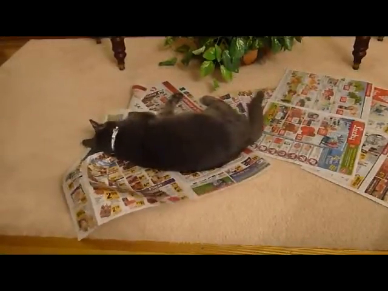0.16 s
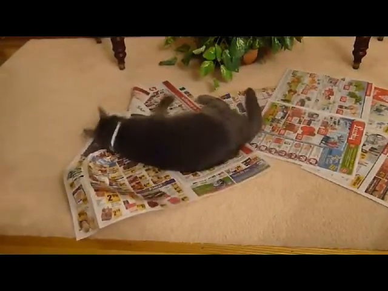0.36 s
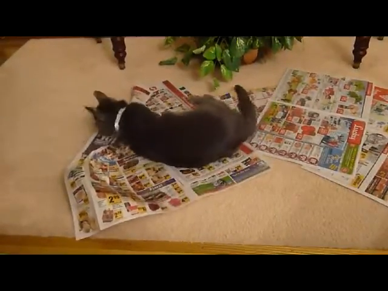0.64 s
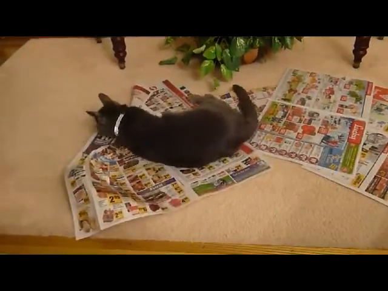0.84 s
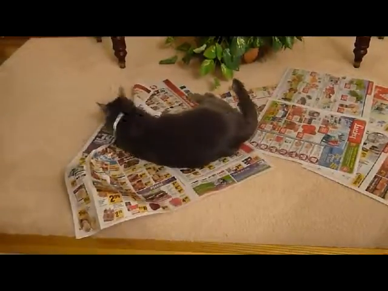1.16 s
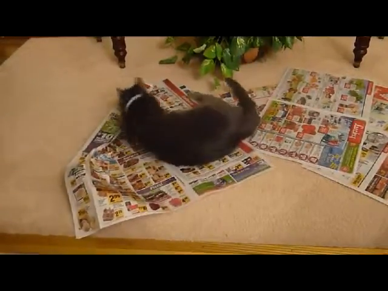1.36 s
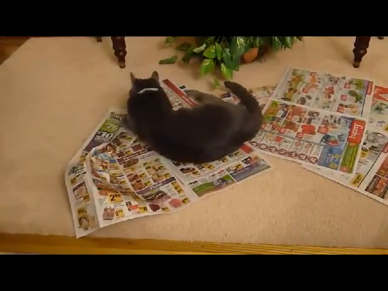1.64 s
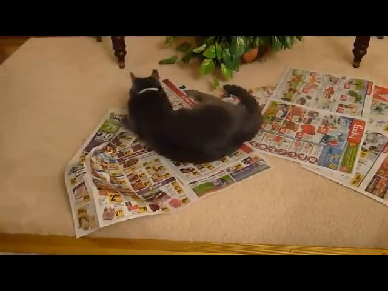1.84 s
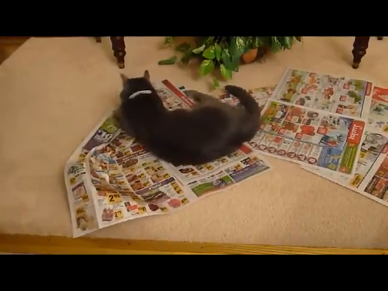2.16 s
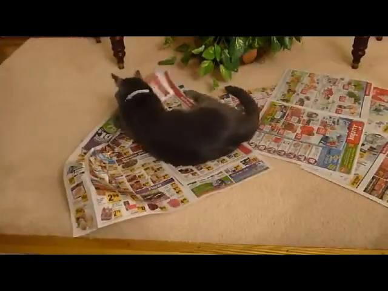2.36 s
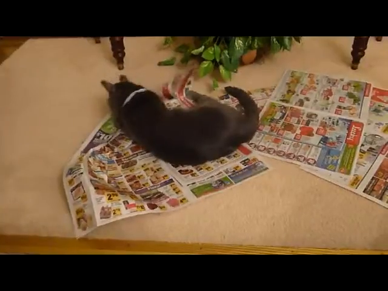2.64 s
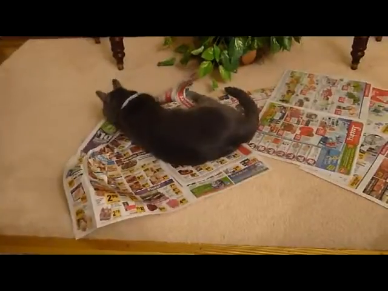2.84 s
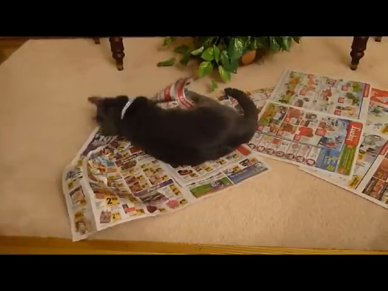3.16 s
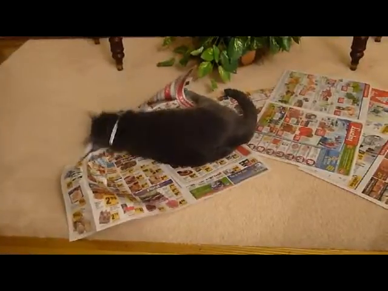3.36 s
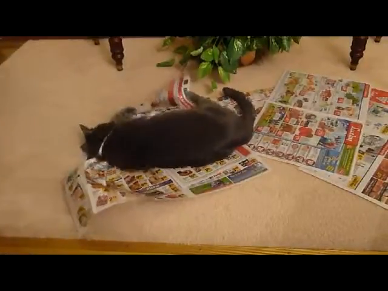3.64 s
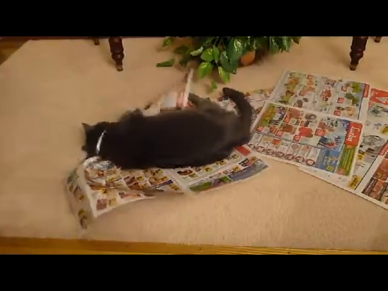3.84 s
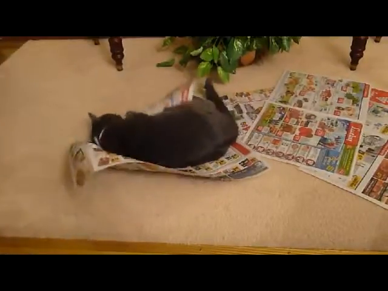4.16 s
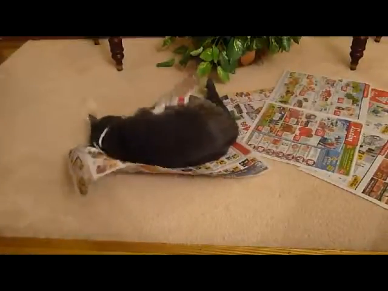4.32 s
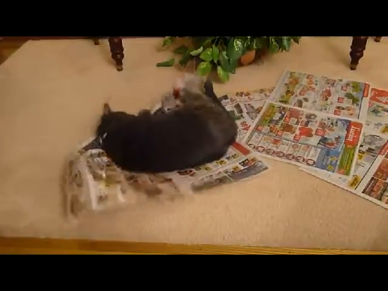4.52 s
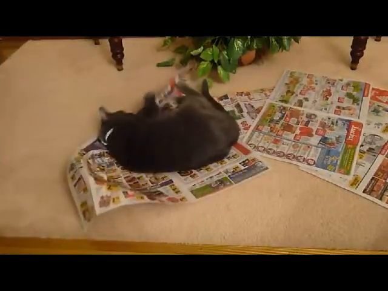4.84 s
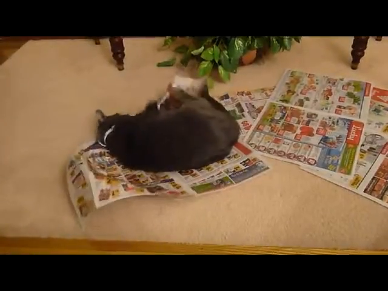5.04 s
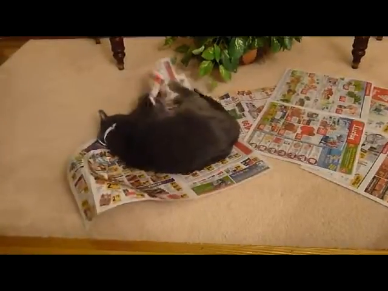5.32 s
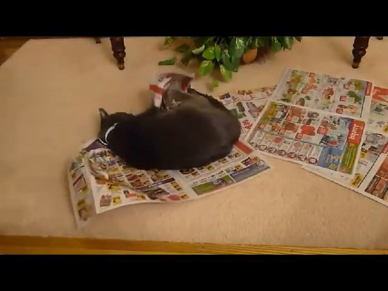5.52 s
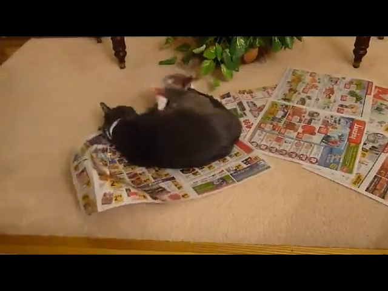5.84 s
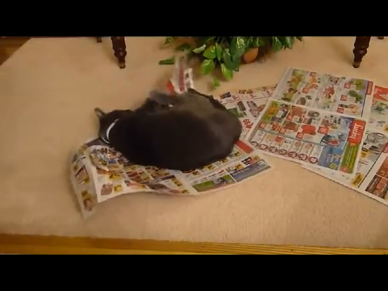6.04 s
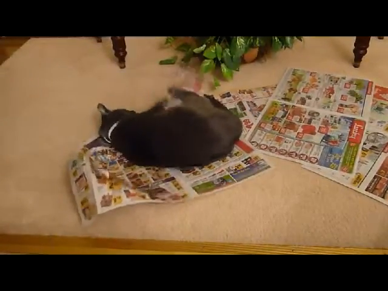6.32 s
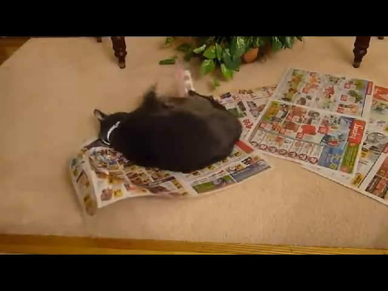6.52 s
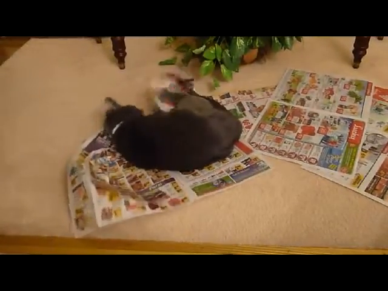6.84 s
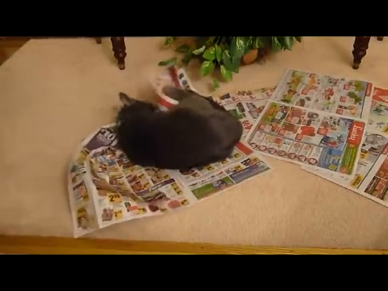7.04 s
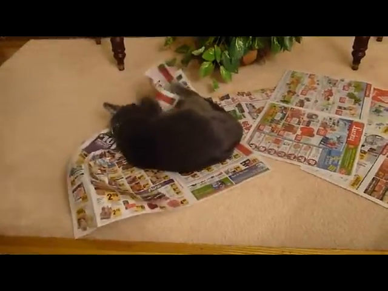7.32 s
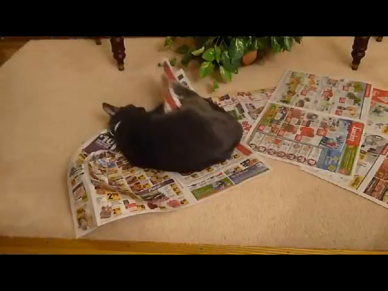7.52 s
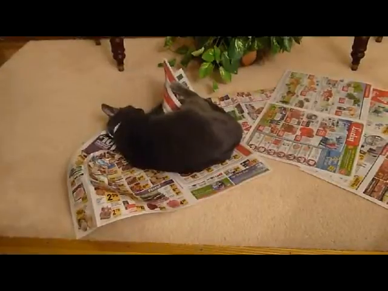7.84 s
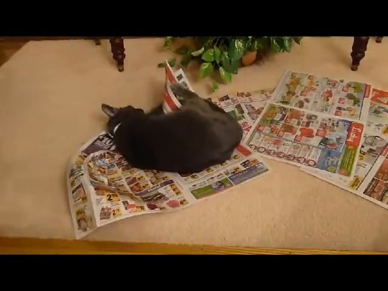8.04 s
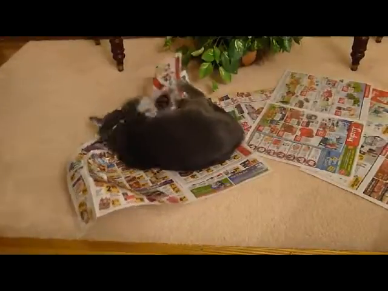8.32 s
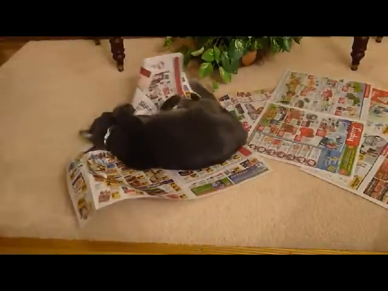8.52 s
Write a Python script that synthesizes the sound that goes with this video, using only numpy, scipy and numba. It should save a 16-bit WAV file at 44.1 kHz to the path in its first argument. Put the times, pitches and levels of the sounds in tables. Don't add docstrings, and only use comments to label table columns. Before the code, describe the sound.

A cat moves on newsprint spread over carpet, heard from about two metres through a small camera microphone with steady soft hush and short room echoes. From 0 to 0.7 s there are light rustles and dry fold cracks, then a near-quiet moment with minute collar tinkles around 0.6 to 0.9 s. Between 1.3 and 2.6 s, separate crisp cracks and short crinkles come in clusters, one sharp snap near 1.9 s. After a softer, creeping rustle, rolling resumes at 3.4 s with fuller crumpling, strong ticks near 3.75 s and continuous crackle past 4 s. From 4.8 to 7.3 s, kicks make the loudest, densest bursts, peaking around 5.4, 6.0 and 6.5 s, with snaps, pops and dull panel flaps. It thins from 7.3 s; a faint clink comes at 8 s, then renewed crackling and tiny tinkles until 8.7 s.

```python
import sys
import numpy as np
from scipy import signal
from scipy.fft import rfft, irfft
from scipy.io import wavfile
from scipy.ndimage import uniform_filter1d
from numba import njit

SR = 44100
rng = np.random.default_rng(int(sys.argv[2]) if len(sys.argv) > 2 else 0)


def decibels_to_gain(level_db):
    exponent = np.asarray(level_db, float) / 20
    return 10 ** exponent


def file_out(sig):
    cols = np.atleast_2d(sig).T
    lim = np.clip(cols, -1, 1)
    pcm = np.round(lim * 32767).astype(np.int16)
    wavfile.write(sys.argv[1], SR, pcm)


N = 382788

# (frequency [Hz], density [dB per Hz])
HUSH_SPECTRUM = [(20, -16.5), (60, -6.5), (100, -4), (180, 3.5), (310, -1), (500, -4.5), (1000, -9.5),
                 (2000, -13.5), (2600, -20), (3900, -22), (4800, -26.5), (6000, -30.5), (7200, -32),
                 (8400, -42.5)]
# (peak time [s], level [dB], rise [dB/s], fall [dB/s],
# broad panels relative [dB])
MOVES = [(.225, -51, 60, 67, 3.5), (.5, -54.5, 30, 132, 1), (.718, -62, 108, 250, 1),
         (1.445, -54.5, 500, 154, 12.5), (1.48, -67, 53, 40, 9), (1.591, -48, 255, 212, 3.5),
         (1.919, -48.5, 343, 70, 5.5), (1.995, -52, 79, 234, -5), (2.13, -47, 232, 164, -11),
         (2.305, -50, 215, 49, 2.5), (2.454, -45.5, 76, 65, -9), (2.57, -52.5, 600, 149, 11.5),
         (2.6, -68, 55, 74, 12), (3.258, -56, 89, 101, 9.5), (3.397, -43.5, 506, 62, 1.5),
         (3.457, -61.5, 74, 83, 9), (3.77, -45, 600, 26.5, -0.5), (3.9, -41.5, 66, 251, -8),
         (3.922, -42.5, 250, 74, -14), (4.02, -48, 58, 78, -1.5), (4.09, -44.5, 146, 112, 0.5),
         (4.27, -47.5, 82, 18, 5), (4.43, -47, 45, 81, -3), (4.648, -53, 70, 74, -7),
         (4.895, -39.5, 900, 330, 5), (4.94, -37.5, 145, 160, 1), (5.068, -44, 100, 190, -3),
         (5.156, -37, 503, 240, 1), (5.185, -44, 200, 260, -3), (5.331, -36, 258, 116, 0),
         (5.377, -37, 400, 140, -2.5), (5.488, -40, 60, 290, 2), (5.652, -51, 130, 19, -6),
         (5.82, -47, 29.7, 38, -2.5), (5.962, -40.5, 400, 90, 2), (5.99, -33, 900, 105, 0.5),
         (6.206, -43.5, 30, 110, 4), (6.366, -40.5, 503, 92, 4), (6.41, -39, 201, 330, 4),
         (6.49, -37, 400, 115, 2.5), (6.546, -38.5, 103, 76, 4), (6.66, -39.5, 400, 120, 2.5),
         (6.814, -41, 400, 65, 0.5), (6.944, -41.5, 40.5, 120, 2), (7.134, -46, 194, 44, -0.5),
         (7.281, -43, 81, 144, 6.5), (7.608, -56, 79.5, 240, 11.5), (8.286, -54.5, 132, 54, -7),
         (8.484, -49.5, 120, 79, -5)]
# (time [s], level [dB])
CREEPING_WEIGHT = [(0, -63), (.65, -59), (1.0, -56.5), (1.75, -60), (2.2, -69), (2.8, -48.5), (3.15, -58),
                   (3.65, -59), (4.2, -44.5), (4.75, -66), (5.6, -58), (6.3, -51), (7.05, -62), (7.5, -52),
                   (7.7, -81), (8.1, -55.5), (8.4, -43), (8.68, -69)]
# (time [s], level [dB])
CRUMPLE = [(0, -22), (.5, 6.5), (1.5, 7), (1.95, -4), (2.5, 2.5), (3.0, 9), (3.42, 4), (3.7, -1.5),
           (4.5, 0), (5.1, 2.5), (5.6, 0), (6.1, 0), (6.9, 1), (7.15, -4), (7.55, 7), (8.25, 5), (8.5, -15),
           (8.68, 15)]
# (low [Hz], high [Hz], ring [cycles], share of smooth rubbing [0-1], level [dB])
BUCKLES = [
    (1800, 4080, 1.7, 0.44, -1.5),
    (111, 497, 0.83, 0.92, -0.5),
    (756, 2060, 1.2, 0.62, 1),
    (4460, 8070, 1.7, 0.09, -1),
]
# (time [s], peak level [dB], ring [Hz], treble relative [dB])
CRACKS = [(0.068, -37, 3250, -35), (0.1178, -29.5, 1940, -37), (0.2069, -29, 1300, -24),
          (0.217, -26, 2150, -40), (0.3357, -35.5, 1540, -13.5), (0.4299, -47, 1980, -27),
          (0.4959, -28, 1540, -17.5), (0.7016, -32.5, 2040, -23), (1.3682, -32.5, 1060, -20),
          (1.4376, -32, 2000, -7.5), (1.5229, -40, 1160, -13), (1.5574, -36, 1520, -28),
          (1.5702, -27.5, 3480, -18), (1.8166, -32.5, 1130, -59), (1.8864, -27, 2060, -35),
          (1.8988, -15.5, 1420, -38), (1.9705, -29, 1500, -12), (2.0974, -32, 1050, -21),
          (2.1131, -27.5, 2020, -25), (2.1427, -30.5, 1630, -26), (2.2832, -32, 2110, -28),
          (2.362, -29, 1880, -42), (2.4367, -27, 1210, -15), (2.4944, -31, 3900, -10),
          (2.5649, -29, 4060, -10), (3.2417, -36, 2100, -19),
          (3.3727, -26.5, 1630, -17), (3.467, -31, 1660, -8), (3.5543, -32, 2000, -25),
               (3.657, -35.5, 1140, -21), (3.6835, -61, 1590, -25), (3.6967, -31.5, 1560, -19.5),
               (3.7519, -18.5, 1980, -11.5), (3.8444, -29, 1160, 0.5), (3.888, -23, 1210, -22),
               (4.069, -26, 1550, -10), (4.1918, -24.5, 990, -28), (4.2523, -27.5, 2020, -15.5),
               (4.3539, -27.5, 1400, -19.5), (4.3826, -39, 980, 3), (4.4059, -22, 2010, -42),
               (4.5886, -40, 1660, -14), (4.6224, -20, 2220, -37), (4.6478, -31.5, 1050, -12),
               (4.7131, -32.5, 1660, -42), (4.77, -35.5, 2900, -7.5), (4.8154, -32, 1030, -14),
               (4.8299, -19.5, 3350, -20.5), (4.8907, -25.5, 2070, -20), (5.0498, -27.5, 1760, -3.5),
               (5.1491, -29, 1120, -13), (5.2853, -43, 3270, -19), (5.2978, -41, 1470, -24),
               (5.3212, -32, 1550, -11), (5.3687, -17.5, 1600, -13), (5.4544, -21, 2050, -18),
          (5.626, -22.5, 2420, -18), (5.724, -29, 1010, -21), (5.7345, -21.5, 2080, -26),
               (5.792, -29, 3920, -18), (5.8022, -29.5, 2090, -16), (5.956, -19.5, 1100, -25),
               (5.9849, -17.5, 2660, -16.5), (6.067, -22, 2050, -22), (6.0888, -24, 1140, -20),
               (6.154, -29, 1990, -18), (6.183, -39, 2510, -24), (6.332, -41, 2660, -5),
               (6.358, -17.5, 1490, -25), (6.384, -21.5, 2180, -26), (6.4695, -22, 2050, -29),
               (6.4921, -16.5, 1500, -11.5), (6.5352, -14, 1080, -16), (6.6489, -23, 1900, -5),
               (6.801, -30, 3480, -7.5), (6.846, -32, 2390, -2.5), (6.9088, -24, 1140, -31),
               (7.102, -29, 1890, -17), (7.215, -21.5, 1530, -21), (7.272, -26.5, 1640, -19),
               (7.5026, -24, 1020, -20), (8.2669, -32, 2040, -22), (8.3539, -29.5, 1530, -13),
               (8.443, -28.5, 3200, -25), (8.4678, -46, 3040, -24), (8.48, -21, 1130, -20),
          (0.4754, -55, 1530, -9), (0.541, -43.5, 785, -6), (0.9829, -38, 995, -33),
                (1.3144, -43, 1350, -30), (2.42, -34, 3300, -27), (2.52, -41, 3940, -14),
                (2.5999, -36, 770, -8), (2.7988, -35, 710, -40), (3.2979, -36, 1540, -32),
                (3.418, -36, 1440, -19), (3.9164, -15, 1180, -40.5), (4.4524, -24, 1020, -23),
                (4.4915, -33, 2050, -21), (5.4983, -25, 1800, -32), (5.668, -34, 1880, -10),
                (5.8914, -30.5, 703, -17.5), (6.4263, -36.5, 780, -19), (6.5994, -25.5, 1480, -14),
                (7.0381, -29.5, 910, -18), (7.2417, -36, 1040, -22), (7.5402, -40, 1095, -13),
                (8.2062, -31.5, 1420, -37), (8.4233, -30.5, 940, -17), (8.6083, -36, 716, -18)]
# (time [s], change of first snap [dB])
YIELDING = [(1.5703, -7.5), (1.8986, -10), (1.8861, -4.5), (3.9164, -8), (4.8289, -8), (4.8907, -3.5),
            (5.0499, -7), (5.3212, -6), (5.3686, -8.5), (5.954, -9), (6.4918, -8), (0.2069, -5),
            (0.2174, -7), (8.4695, -4), (0.1186, -4.5), (6.5332, -5), (1.4366, -3.5), (3.467, -3.5),
            (3.7513, -5.5), (3.8446, -7.5), (4.3824, -6), (4.4063, -6.5), (4.4524, -6.5), (4.6228, -4.5),
            (5.1491, -6), (5.4544, -5), (5.6258, -5), (5.7353, -8), (5.791, -6.5), (5.8022, -4.5),
            (6.357, -2.5), (7.215, -4), (7.2417, -1.5), (7.5402, -4.5), (4.0686, -5), (8.48, -3.5)]
# (time [s], peak level [dB], frequency [Hz])
POPS = [(0.4437, -39, 2500), (1.5326, -45, 4180), (1.5714, -33, 3400), (1.985, -29, 2200),
        (2.4116, -34, 4050), (2.5096, -33, 6200), (2.5684, -29, 2280), (2.5686, -40, 4010),
        (2.5792, -36, 5470), (2.6011, -35, 1890), (3.3903, -33, 1850), (3.436, -34, 5860),
        (3.4468, -38, 4220), (3.4707, -30, 5510), (3.685, -40, 1590), (3.6845, -46, 4010),
        (3.7553, -29, 4010), (3.7613, -18.5, 3190), (3.782, -31, 3270), (3.8476, -25.5, 5940),
        (3.9165, -37, 4480), (3.9162, -27, 3190), (4.385, -33, 5810), (4.8392, -31, 4050),
        (5.0483, -33, 3100), (5.057, -32, 5470), (5.1498, -38, 1850), (5.1584, -36, 2370),
        (5.253, -35, 3490), (5.3311, -24.5, 5810), (5.3638, -28, 2530), (5.529, -33, 2110),
        (5.7402, -28, 3450), (5.7936, -35, 3270), (5.8065, -32, 1890), (6.0267, -30, 4870),
        (6.0899, -22.5, 2580), (6.0927, -31, 5860), (6.185, -33, 2670), (6.2068, -37, 4050),
        (6.3617, -41, 4440), (6.3846, -34, 4010), (6.4262, -30, 1770), (6.5172, -23, 1510),
        (6.5426, -33, 4010), (6.5495, -30, 5510), (6.5739, -26, 5600), (6.5883, -34, 6070),
        (6.6097, -32, 4520), (6.6744, -32, 1810), (6.6923, -30, 2070), (6.8828, -28, 2150),
        (7.2301, -30, 1850), (7.2748, -31.5, 4390), (8.4686, -33, 3140), (8.4786, -41, 5860)]
# (time [s], level [dB], frequency [Hz], t60 as the fur lets it ring [s])
TINKLES = [(.640, -54, 6051, .1), (.648, -56, 6051, .5), (.815, -57, 3560, .12), (.848, -55.5, 3480, .1),
           (.866, -58, 3420, .12), (.882, -58, 3450, .1), (7.982, -53, 2420, .1),
           (7.9903, -50.5, 2420, .09), (8.567, -57, 6051, .1), (8.575, -49, 6051, .08),
           (8.598, -56, 6051, .07), (8.655, -54, 6051, .04)]
# (multiple of frequency [1], level [dB], share of t60 [1])
BELL_PARTIALS = [
    (1.002, -2, 0.32),
    (1.128, -10, 0.16),
]
# (time [s], peak level [dB], frequency [Hz])
TICKS = [(1.4374, -28, 2600), (1.5238, -32, 3410), (1.587, -42, 2480), (1.9699, -17, 3930),
         (1.98, -19, 2690), (2.4104, -31, 2650), (2.565, -18, 3930), (3.7521, -9, 3560),
         (3.756, -7.5, 3300), (3.8469, -35, 3990), (3.9594, -25, 2790), (5.0499, -33, 3380),
         (5.3133, -27, 2420), (5.328, -20, 3260), (5.3757, -4, 2560), (6.4687, -31, 2400),
         (6.4695, -18, 2540), (6.534, -27, 2420), (6.5423, -14, 3870), (6.574, -26, 2690),
         (6.649, -16, 3990), (6.6615, -24, 3800), (6.6685, -37, 4080), (6.8004, -29, 3500),
         (6.9104, -13, 2990), (7.514, -20, 2620), (8.3525, -25, 2640), (8.4422, -29, 3380),
         (8.48, -21, 2680),
         (2.4933, -28, 3800), (3.371, -30, 2320), (4.1904, -34, 2070), (4.2527, -25, 1990),
                 (4.8915, -20, 2050), (5.15, -22, 3610), (5.9856, -25, 2950), (5.9859, -7, 2640),
                 (6.0686, -21, 2010), (6.0886, -24, 2540), (6.3563, -31, 2310), (6.8447, -21, 2370),
                 (7.273, -26, 3420), (7.5016, -36, 2620), (8.4677, -27, 2680)]
# (time [s], level [dB], frequency [Hz])
FLAPS = [(1.59, -50, 160), (1.9, -48, 480), (2.788, -43, 300), (3.461, -50, 150), (4.3, -43, 285),
         (5.31, -36, 280), (5.97, -43, 496), (5.99, -47, 229), (6.04, -44, 482), (6.365, -36, 528),
         (6.47, -35.5, 490), (6.64, -40, 283), (6.82, -48, 288), (7.151, -42, 282), (7.261, -47, 260)]
# (delay [s], level [dB])
ECHOES = [
    (.0033, -10.5),
    (.0088, -19.5),
    (0.0133, -23),
    (0.019, -35.5),
]
# (band centre [Hz], t60 [s], level [dB])
TAIL_BANDS = [
    (187, 0.47, -7),
    (644, 0.49, -3.5),
    (1600, 0.41, -8),
    (4830, 0.19, -12.5),
]
# (frequency [Hz], width [Hz], level [dB])
ROOM_MODES = [(226, 17, -5), (293, 23, -1), (491, 71, -4), (603, 55, -10), (714, 36, -9)]
# (frequency [Hz], gain [dB])
MIC_RESPONSE = [(30, -24), (90, -9), (260, -5.5), (400, -7), (510, -1.5), (850, -4.5), (1300, -3),
                (1800, -0.5), (2900, 0.5), (3700, 4), (4900, 3), (5900, 6), (7000, 0.5), (8000, -3)]
# (low [Hz], high [Hz])
IMAGE_BANDS = [(9550, 9950), (10300, 10700)]


def unit(x):
    return x / np.sqrt(np.mean(x ** 2))


def colour(x, points):
    hz, db = np.transpose(points)
    f_hz = np.maximum(np.arange(len(x) // 2 + 1) * SR / len(x), 1)
    gain_db = np.interp(np.log(f_hz), np.log(hz), db)
    return irfft(rfft(x) * decibels_to_gain(gain_db), len(x))


def band(x, lo_hz, hi_hz):
    return signal.sosfilt(signal.butter(2, [lo_hz, hi_hz], "bandpass", fs=SR, output="sos"), x)


def walk(rate_hz):
    hold = int(SR / rate_hz)
    steps = np.repeat(rng.standard_normal(N // hold + 1), hold)
    return 1.46 * uniform_filter1d(steps, hold)[:N]


@njit
def ring(s, hz, t60_s, size):
    out = np.zeros(N)
    for k in range(len(s)):
        i = int(s[k] * SR)
        turn = np.exp((2j * np.pi * hz[k] - np.log(1000) / t60_s[k]) / SR)
        z = size[k] + 0j
        for j in range(i, min(N, i + int(t60_s[k] * SR))):
            z *= turn
            out[j] += z.imag
    return out


def hush(level_db=-52.5):
    noise = colour(rng.standard_normal(N), HUSH_SPECTRUM)
    bass = signal.sosfilt(signal.butter(2, 500, fs=SR, output="sos"), noise)
    breath = decibels_to_gain(0.84 * walk(4.1)) - 1
    return unit(noise + bass * breath) * decibels_to_gain(level_db)


def effort(panels=False, panel_lag=0.79, creep_db=-13.5):
    t = np.arange(0, N, 64) / SR
    s, db, rise, fall, panel_db = np.transpose(MOVES)[:, :, None]
    drop_db = np.where(t < s, rise, fall) * np.abs(t - s)
    weight_db = np.interp(t, *np.transpose(CREEPING_WEIGHT))
    if panels:
        moves_db = db + panel_db - panel_lag * drop_db
    else:
        moves_db = db - drop_db
        weight_db = weight_db + creep_db
    power = np.sum(decibels_to_gain(2 * moves_db), axis=0) + decibels_to_gain(2 * weight_db)
    return np.interp(np.arange(N) / SR, t, 10 * np.log10(power))


def rustle(count=12000, spread_db=1.0, most_db=7.5, own_db=2.5, patchy_db=2.0):
    middle_db, finest_db = 2, -10
    brighten = 0.31
    crackle_db = effort()
    crumple_db = np.interp(np.arange(N) / SR, *np.transpose(CRUMPLE))
    fine_db = crackle_db + crumple_db + finest_db + brighten * (crackle_db + 38.5)
    levels_db = [crackle_db, effort(True), crackle_db + middle_db, fine_db]
    when_s = rng.uniform(0, N / SR, count)
    size_db = np.minimum(spread_db * rng.exponential(size=count), most_db)
    out = 0
    for (lo_hz, hi_hz, cycles, rub, db), level_db in zip(BUCKLES, levels_db):
        hz = lo_hz * (hi_hz / lo_hz) ** rng.uniform(size=count)
        size = decibels_to_gain(size_db + own_db * rng.uniform(-0.6, 3.7, count)) * rng.choice([-1, 1], count)
        snaps = band(ring(when_s, hz, 3 * cycles / hz, size), lo_hz, hi_hz)
        fur = band(rng.standard_normal(N), lo_hz, hi_hz)
        mix = np.sqrt(1 - rub) * unit(snaps) + np.sqrt(rub) * unit(fur)
        out = out + mix * decibels_to_gain(level_db + db + patchy_db * walk(25))
    return out


def tension(times_s, hold_s=0.025, most_db=1.65, slack_s=0.036):
    t, out = np.arange(N) / SR, np.zeros(N)
    for s in times_s:
        near = slice(max(int((s - .08) * SR), 0), int((s + 0.07) * SR))
        lag_s = t[near] - s
        taut_db = -most_db * np.exp(np.minimum(lag_s, 0) / hold_s)
        slack_db = 0.92 * most_db * np.exp(-np.maximum(lag_s, 0) / slack_s)
        out[near] += np.where(lag_s < 0, taut_db, slack_db)
    return out


def folds(count=30, loose_db=0.5, treble_db=-21.0):
    c = rng.uniform(size=(count, 4)).T
    s = c[0] * (N - 1) / SR
    db = effort()[(s * SR).astype(int)] + loose_db + 6 * c[1]
    loose = [s, db, 1100 * 2 ** (1.1 * c[2]), treble_db + 12 * c[3]]
    listed = np.transpose(CRACKS)
    return np.hstack([listed, loose])


def cracks(s, db, hz, rel_treble_db, cycles=3.92, ring_db=-2.0, edge_db=-8.0, treble_db=5.5,
           bass_db=-12.0, shower_db=-2.0, shower_s=.008, count=16):
    brightness_db = rel_treble_db + 18
    rel_shower_db = -7.5 - 0.087 * (db + 38.5) + 0.21 * brightness_db
    c = rng.uniform(-1, 1, (len(s), 5 + 3 * count)).T
    parts = [
        (s, hz, db + ring_db),
        (s + .0005 + 0.00038 * c[3], 3200 * 2 ** (0.51 * c[0]), db + edge_db + 0.81 * brightness_db),
        (s + 0.00076 + 0.00072 * c[2], 1500 * 2 ** (.5 * c[1]), db + edge_db),
        (s + 0.00014, 5900 * 2 ** (0.33 * c[2]), db + rel_treble_db + treble_db),
        (s + 0.00053, 450 * 2 ** (0.74 * c[3]), db + bass_db),
    ]
    yield_s, less_db = np.transpose(YIELDING)
    lead_db = (np.abs(s[:, None] - yield_s) < .004) @ less_db
    parts = [(at_s, f_hz, g_db + lead_db) for at_s, f_hz, g_db in parts]
    for late, pitch, size in c[5:].reshape(count, 3, -1):
        delay_s = .002 - (shower_s - 0.00043 * lead_db) * np.log((1.02 + late) / 2.02)
        bright_db = 0.42 * np.maximum(pitch, 0) * (rel_treble_db + treble_db)
        f_hz = np.sqrt(2400 * hz) * 2 ** (1.5 * pitch)
        parts.append((s + delay_s, f_hz, db + rel_shower_db + shower_db + bright_db + 2.4 * size))
    out = 0
    for at_s, f_hz, g_db in parts:
        t60_s = 3 * cycles / f_hz * (f_hz / 1500) ** 0.5
        out = out + ring(at_s, np.minimum(f_hz, 8000.), t60_s, decibels_to_gain(g_db) * np.sign(c[4]))
    return out


def pops(cycles=2.9, gain_db=3.5):
    s, db, hz = np.transpose(POPS)
    t60_s = 3 * cycles / hz
    facet = ring(s, 1. * hz, t60_s, decibels_to_gain(db + gain_db))
    neighbour = ring(s, 0.6 * hz, t60_s, decibels_to_gain(db + gain_db - 5.5))
    return facet - neighbour


def bell():
    s, db, hz, t60_s = np.transpose(TINKLES)
    flutter = decibels_to_gain(2 * walk(150))
    return flutter * sum(ring(s, k * hz, share * t60_s, decibels_to_gain(db + g_db)) for k, g_db, share in BELL_PARTIALS)


def ticks(cycles=0.94, gain_db=-3.5):
    s, db, hz = np.transpose(TICKS)
    return -ring(s, hz, 3 * cycles / hz, decibels_to_gain(db + gain_db))


def flaps(t60_s=0.14, push_s=0.006):
    s, db, hz = np.transpose(FLAPS)
    each = np.ones(len(s))
    first = ring(s, 1. * hz, t60_s * each, decibels_to_gain(db))
    second = ring(s + 0.014, 0.87 * hz, t60_s * each, decibels_to_gain(db - 2.5))
    soft_onset = ring(s, 1. * hz, push_s * 3 * each, decibels_to_gain(db))
    return first + second - soft_onset


def responses(count, drift=.12):
    t = np.arange(SR // 4) / SR
    out = np.zeros((count, len(t)))
    out[:, 0] = 1
    for delay_s, db in ECHOES:
        lag = (delay_s * SR * (1 + drift * rng.uniform(-1, 1, count))).astype(int)
        out[np.arange(count), lag] += decibels_to_gain(db)
    onset = 1 - np.exp(-t / 0.0057)
    half = 3 ** .5
    for hz, t60_s, db in TAIL_BANDS:
        tail = band(rng.standard_normal(out.shape), hz / half, hz * half)
        tail = tail * onset * 1000 ** (-t / t60_s)
        share = 2 * hz * (half - 1 / half) / SR
        out += decibels_to_gain(db) * tail * np.sqrt(share / np.mean(np.sum(tail ** 2, axis=1)))
    return out


def room(x, count=80):
    out, hop = np.zeros(N + SR), N // count + 1
    for i, response in zip(range(0, N, hop), responses(count)):
        heard = signal.fftconvolve(x[i:i + hop], response)
        out[i:i + len(heard)] += heard
    return out[:N]


def boom(x):
    out = x
    for hz, width_hz, db in ROOM_MODES:
        out = out + decibels_to_gain(db) * signal.lfilter(*signal.iirpeak(hz, hz / width_hz, fs=SR), x)
    return out


def scene():
    snapped = folds()
    rustling = decibels_to_gain(tension(snapped[0]) - 3.5) * rustle()
    paper = rustling + cracks(*snapped) + pops() + ticks() + flaps()
    heard = colour(boom(room(paper + bell())), MIC_RESPONSE)
    return (heard + hush())[None]


def roll_off(x):
    return signal.sosfilt(signal.butter(12, 13500, fs=SR, output="sos"), x)


def record(dry):
    top_hz, clock_hz = 8286, 16000
    overtone_db, image_db, offset = -23, -9, .0146
    cut = signal.sosfilt(signal.ellip(8, .3, 56, top_hz, fs=SR, output="sos"), dry)
    overtone_band = signal.butter(6, [9400, 12800], "bandpass", fs=SR, output="sos")
    overtones = signal.sosfilt(overtone_band, cut ** 2)
    clock = np.cos(2 * np.pi * clock_hz * np.arange(N) / SR)
    mirror = cut * clock * uniform_filter1d(np.abs(cut), size=600)
    image = sum(band(band(mirror, lo_hz, hi_hz), lo_hz, hi_hz) for lo_hz, hi_hz in IMAGE_BANDS)
    mix = cut + decibels_to_gain(overtone_db) * overtones + decibels_to_gain(image_db) * image + offset
    return roll_off(mix)


dry = scene()
out = record(dry)
file_out(out)
```